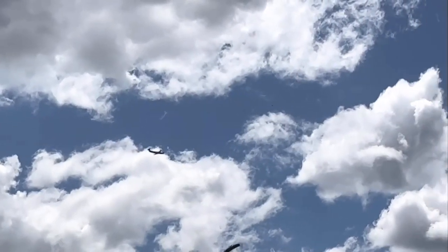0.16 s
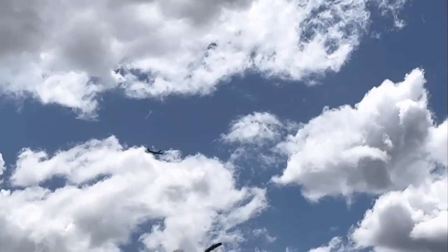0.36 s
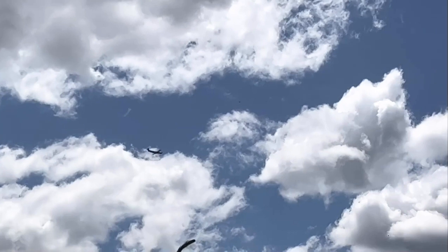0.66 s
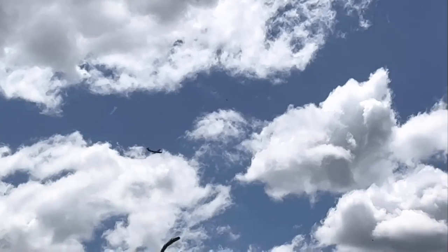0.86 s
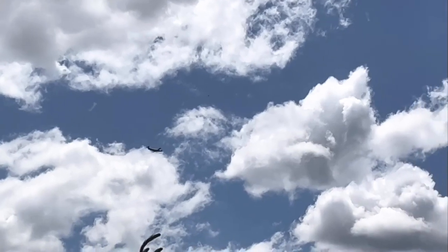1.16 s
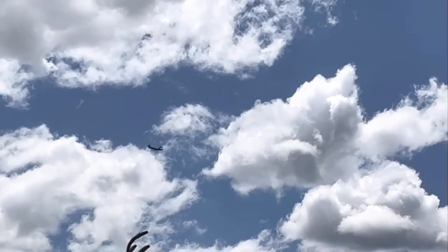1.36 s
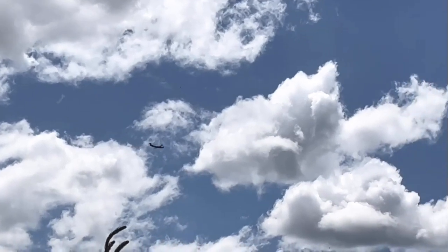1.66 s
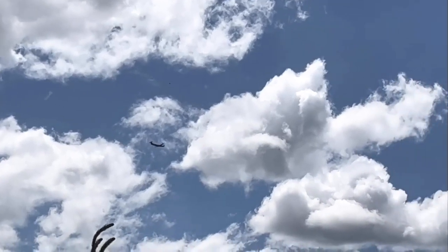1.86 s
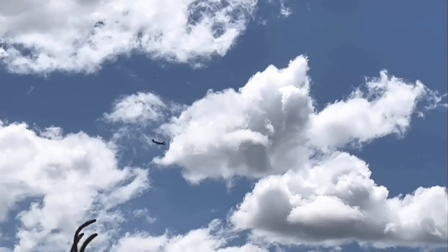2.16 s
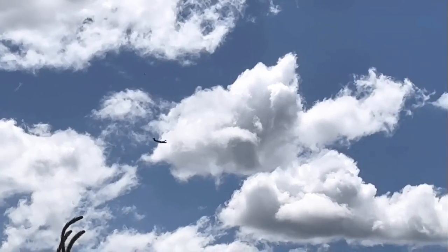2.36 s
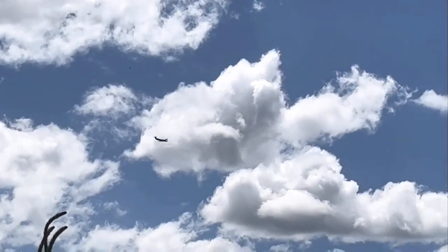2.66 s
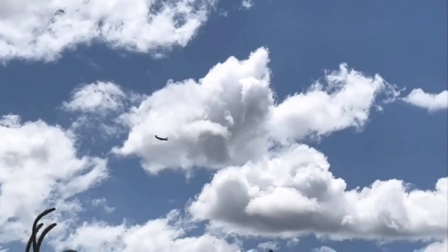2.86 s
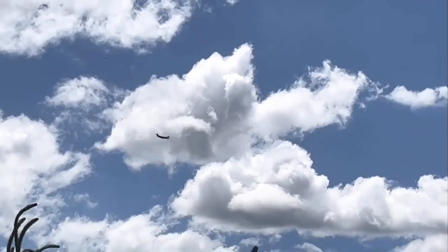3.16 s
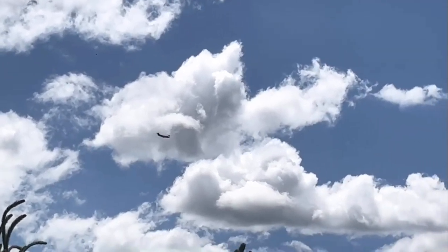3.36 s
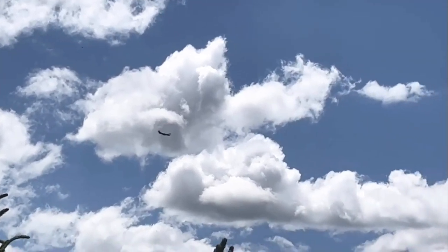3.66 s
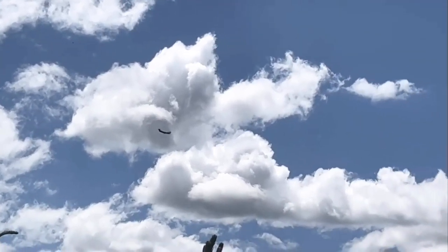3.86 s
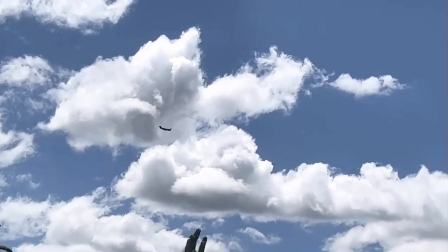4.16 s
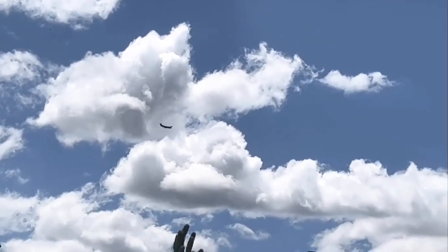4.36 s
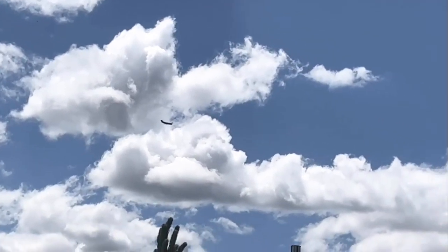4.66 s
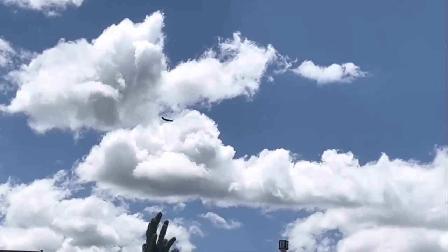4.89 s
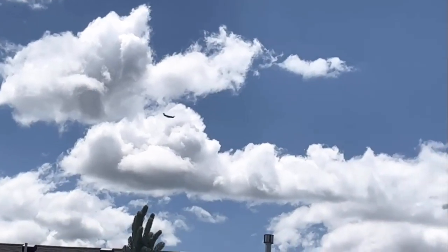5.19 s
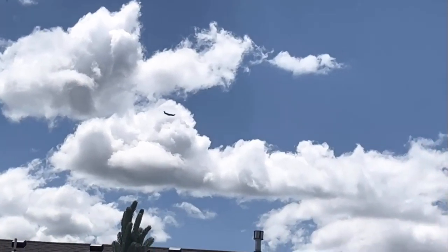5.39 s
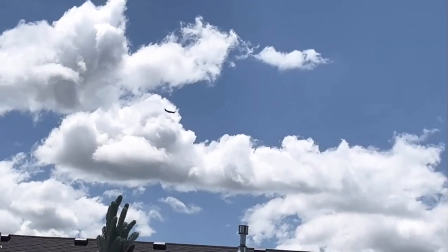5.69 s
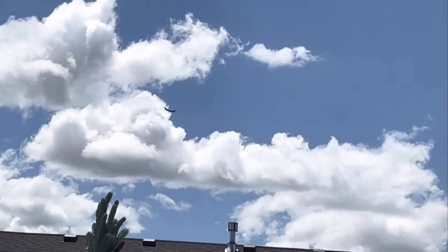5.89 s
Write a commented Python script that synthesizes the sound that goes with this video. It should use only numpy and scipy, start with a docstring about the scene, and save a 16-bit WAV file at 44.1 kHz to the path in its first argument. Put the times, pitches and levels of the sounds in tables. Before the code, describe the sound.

A twin-propeller airplane climbs away, heard from a yard. Its low drone stands out at first and sinks slightly in pitch, while a broad engine roar swells and fades in the moving air. Gusts of wind then buffet the microphone with rumbles and sharp, low thumps. The wind eases, the propeller tone turns faint, and the roar keeps swelling from farther off.

```python
"""From a yard, a twin-propeller airplane is heard climbing away under a breezy sky.
At first its blade tones stand out, sinking slowly in pitch, while moving air makes the broad roar
swell and fade. From just after one second until nearly four, gusts buffet the microphone hardest
and single eddies thump against its port. Then the wind eases, the tones are faint,
and the roar swells on from farther off."""
import sys
import numpy as np
from scipy import signal
from scipy.fft import rfft, irfft
from scipy.io import wavfile
from scipy.ndimage import uniform_filter1d

SR = 44100
rng = np.random.default_rng(int(sys.argv[2]) if len(sys.argv) > 2 else 0)


def wrap_up_sound(samples):
    """Save the sound to the file named by the first command line argument, as 16-bit audio."""
    columns = np.atleast_2d(samples).T
    # keep every value between -1 and 1, then stretch to whole-number steps
    tamed = np.clip(columns, -1, 1)
    steps = np.round(tamed * 32767).astype(np.int16)
    wavfile.write(sys.argv[1], SR, steps)


N = 265906
TIME = np.arange(N) / SR
FREQ = np.maximum(np.arange(N // 2 + 1) * SR / N, 1)


def propellers(body_db, twin_db=-22, detune_hz=1.3, wander_rad=0.13, flutter_db=1.36):
    """Two propellers, slightly out of step; turbulent air shakes the higher harmonics most."""
    # The pitch falls as the airplane turns its tail to the microphone.
    # Each row: time in seconds, blade-passing rate in Hz.
    blade_rate = [(0, 132.1), (1, 130.9), (2, 129.7), (3, 128.6), (4, 127.5), (5, 127), (6, 126)]
    # Blade tones, loudest while the propellers are side-on to the yard.
    # Each row: time in seconds, first harmonic in dB, second harmonic in dB.
    drone = [(0, -37, -52.5), (.35, -34, -37.5), (.5, -38.5, -38.5), (.75, -30, -38.5), (.9, -29, -39),
             (1.65, -25.5, -38), (2.1, -28, -47), (2.33, -34, -39.5), (2.55, -31, -36),
             (2.75, -37.5, -44.5), (3.3, -34.5, -45), (3.52, -49.5, -52), (3.9, -51.5, -54),
             (4.35, -44, -41), (4.65, -45, -51), (4.9, -55, -51), (5.45, -54, -61), (5.8, -44, -47)]
    # Weaker harmonics. Each row: multiple of the blade rate, level in dB against the roar's body.
    overtones = [(3, -7.5), (4, -22.5), (5, -25)]
    blade_phase = 2 * np.pi * np.cumsum(curves(blade_rate)[0]) / SR
    slip = 2 * np.pi * detune_hz * TIME
    tones = list(enumerate(curves(drone), 1)) + [(round(k), body_db + db) for k, db in overtones]
    out = 0
    for k, db in tones:
        phase = k * blade_phase + k ** 2 * wander_rad * walk(7.5) + rng.uniform(0, 2 * np.pi)
        pair = np.sin(phase) + undb(twin_db) * np.sin(phase + k * slip)
        out = out + np.sqrt(2) * pair * undb(db + flutter_db * k * walk(9.5))
    return out


def roar(levels_db, flicker_db=1.5):
    """Broad engine noise; each range fades in its own way on the long path down to the yard."""
    # Each row: frequency in Hz, relative spectral level in dB.
    roar_colour = [(50, -21.5), (110, -1.5), (220, 6), (400, -3), (560, -7), (760, -11), (1000, -9),
                   (1130, -13), (1350, -28), (1650, -18.5), (1900, -28), (2250, -30), (2750, -48.5),
                   (3400, -63)]
    edges_hz = [0, 330, 680, 1350, 3600]  # deep part, body, middle, top
    out = 0
    for lo_hz, hi_hz, db in zip(edges_hz, edges_hz[1:], levels_db):
        band = scatter(noise(roar_colour, lo_hz, hi_hz))
        out = out + even(band, seconds=0.22) * undb(db + flicker_db * walk(12))
    return out


def roar_levels():
    """Four ranges of the roar in dB: all ride the swells, and the upper three fade with distance."""
    # The deep part's slow course. Each row: time in seconds, level in dB.
    rumble = [(0, -44), (.45, -46), (1, -44.5), (1.6, -40), (2.2, -43.5), (2.6, -39.5), (3.5, -49.5),
              (4, -49), (4.35, -45), (4.85, -44.5), (5.4, -45), (6, -39.5)]
    body_lift = swells(share=0.8, bright=-.45)
    deep_db = curves(rumble)[0] + .3 * body_lift
    body_db = -48.3 - 0.55 * TIME + body_lift
    middle_db = -52 - TIME + swells()
    top_db = -61 - 0.42 * TIME + swells(share=0.71, bright=0.98, late=0.93)
    return deep_db, body_db, middle_db, top_db


def swells(share=1, bright=0, late=0, fall_ratio=1.82):
    """Moving air bends the roar towards the microphone; gives the lift of one range in dB."""
    # Each row: crest in seconds, rise in seconds, lift in dB, brightness in dB, lag in seconds.
    # A range weights the last three by share, bright and late.
    crests = [(.08, 0.034, 4, 0, .02), (0.411, 0.074, 11, -3, .045), (.69, 0.12, 2, 2.5, -.03),
              (.96, 0.13, 16, 1.3, 0.062), (1.23, 0.07, 5, -4.5, -0.051), (1.38, 0.098, 3.5, -1.5, 0.051),
              (1.56, .11, 10.5, -1.1, .08), (1.862, 0.09, 6.5, -3, 0.041), (2.12, 0.067, 5.5, 0.8, -0.0088),
              (2.63, 0.11, 9, 1, 0.044), (2.89, .11, 11, -3.5, .06), (3.14, 0.074, 0, 0, 0.5),
              (3.36, 0.13, 1.5, -3, 0.024), (3.69, 0.25, 4, -1.5, .04), (3.98, 0.045, 2.5, 2.5, 0.095),
              (4.18, 0.12, 13.5, -1.5, 0.083), (4.57, 0.053, 2, -2, 0.52), (5.16, 0.13, 1.5, 0, 0.067),
              (5.9, 0.18, 4.5, -1.5, -.04)]
    lift = 0
    for crest_s, rise_s, lift_db, bright_db, lag_s in crests:
        age = (TIME - crest_s - late * lag_s) / rise_s
        shape = np.exp(-(age / np.where(age < 0, 1, fall_ratio)) ** 2)
        lift = lift + (share * lift_db + bright * bright_db) * shape
    return lift


def scatter(x, depth=0.12, spread_s=.009):
    """Stray paths through moving air arrive late and fade in and out, so spectral dips drift."""
    paths = [np.roll(x, int(rng.uniform(.1, 1) * spread_s * SR)) * walk(4.6) for _ in range(6)]
    return x + depth * sum(paths)


def rush(top_db, loud_db=-48, rush_db=-62, growth=2.0, fade_db_s=0.6):
    """The strongest swells carry a bright edge that the air otherwise swallows, more so from afar."""
    # Each row: frequency in Hz, relative spectral level in dB.
    colour = [(1900, -15.0), (2400, -1.0), (2900, -4.5), (3400, -13.5), (3800, -32.0)]
    level_db = rush_db + growth * (top_db - loud_db) - fade_db_s * TIME
    return noise(colour, 1800, 4500) * undb(level_db)


def wind(gain_db=0.35, knee_db=-34, eddy_share=0.29):
    """Turbulence at the microphone port, held back in the hardest gusts, where it breaks into eddies."""
    # Each row: frequency in Hz, relative spectral level in dB.
    wind_colour = [(12, -31.5), (25, -22), (40, -2), (68, 2.5), (110, -2), (180, -14), (300, -14.5),
                   (600, -38), (1500, -66)]
    gust_db = gusts()
    churn_db = gust_db - eddy_share * np.maximum(gust_db - knee_db, 0)
    return even(noise(wind_colour, 0, 2500), seconds=0.075) * undb(churn_db + gain_db)


def gusts(breeze_db=-60, attack_s=0.044, release_s=.05):
    """Wind strength at the microphone in dB: each gust rises, holds and dies back into the breeze."""
    # Each row: start in seconds, length in seconds, strength in dB.
    buffets = [(0.036, 0.13, -47), (0.276, .08, -53), (.61, 0.11, -38), (0.824, 0.27, -42),
               (1.248, .31, -27.5), (1.66, 0.069, -28), (1.88, 0.27, -36.5), (2.248, 0.22, -35.5),
               (2.487, 0.23, -20.5), (2.77, 0.062, -29), (2.864, .1, -29.5), (3.094, 0.17, -36),
               (3.373, 0.044, -28.5), (3.624, 0.15, -29), (3.98, .17, -52.5), (4.5, 0.056, -39.5),
               (4.65, 0.055, -47), (5.543, 0.046, -46.5)]
    power = undb(breeze_db) ** 2
    for start_s, length_s, db in buffets:
        before = np.maximum(start_s - TIME, 0) / attack_s
        after = np.maximum(TIME - start_s - length_s, 0) / release_s
        power = power + (undb(db) * np.exp(-before - after)) ** 2
    return 10 * np.log10(power)


def eddies(rise_cycles=.42, fall_cycles=1.3, slowing=.4):
    """Each eddy hits the port as a pressure swing of a cycle or two that slows as it dies away."""
    # Each row: time of the peak in seconds, envelope peak in dB, pitch in Hz.
    thumps = [(1.395, -13.5, 129.6), (1.546, -24.5, 99.4), (1.67, -13, 95), (2.485, -10.5, 96),
              (2.543, -14, 134), (2.563, -13, 130), (2.597, -15, 192), (2.618, -22, 480), (2.63, -10, 126),
              (2.648, -18.5, 100), (2.792, -14.5, 150), (3.157, -22.5, 260), (3.203, -17, 171),
              (3.321, -20, 250), (3.352, -22, 318), (3.368, -14, 221), (3.616, -20.5, 362),
              (3.654, -27, 277), (3.699, -19.5, 120), (3.732, -16.5, 391), (3.757, -17, 86)]
    out = np.zeros(N)
    for peak_s, db, hz in thumps:
        near = np.abs(TIME - peak_s) < .05
        cycles = (TIME[near] - peak_s) * hz
        shape = np.exp(-(cycles / np.where(cycles < 0, rise_cycles, fall_cycles)) ** 2)
        swing = cycles / np.sqrt(1 + slowing * np.maximum(cycles, 0))
        out[near] += undb(db) * shape * np.sin(2 * np.pi * (swing + rng.uniform()))
    return signal.sosfilt(signal.butter(4, 1600, fs=SR, output="sos"), out)


def hiss(level_db=-87):
    """A faint, steady hiss behind everything."""
    # Each row: frequency in Hz, relative spectral level in dB.
    hiss_colour = [(100, -1), (3000, 1), (5200, 0.5), (6500, -8), (9000, -4), (11000, -7), (13000, -29)]
    return undb(level_db) * noise(hiss_colour)


def undb(db):
    """Decibels to gain."""
    return 10 ** (np.asarray(db) / 20)


def curves(table):
    """Each value column of (seconds, value, ..) rows, joined by straight lines."""
    times_s, *columns = np.transpose(table)
    return [np.interp(TIME, times_s, column) for column in columns]


def noise(colour, lo_hz=0, hi_hz=SR):
    """Noise of rms 1 with a colour of (Hz, dB) points, kept between two edges."""
    hz, db = np.transpose(colour)
    gain = undb(np.interp(np.log(FREQ), np.log(hz), db)) * (FREQ > lo_hz) * (FREQ < hi_hz)
    x = irfft(rfft(rng.standard_normal(N)) * gain, N)
    return x / x.std()


def walk(rate_hz):
    """Smooth random drift of spread 1 that changes about rate_hz times a second."""
    x = irfft(rfft(rng.standard_normal(N)) / (1 + (FREQ / rate_hz) ** 4), N)
    return x / x.std()


def even(x, seconds):
    """Noise without its slow swells, so that a control sets its strength."""
    return x / np.sqrt(uniform_filter1d(x ** 2, max(int(seconds * SR), 2)) + 1e-12)


def scene():
    """One microphone in the yard: the airplane far off, the wind right at the port, a faint hiss."""
    deep_db, body_db, middle_db, top_db = roar_levels()
    airplane = propellers(body_db) + roar([deep_db, body_db, middle_db, top_db]) + rush(top_db)
    return (airplane + wind() + eddies() + hiss())[None]


def record(dry, image_db=-63, image_hz=9600, bass_hz=24, top_hz=12300):
    """The recorder drops the deepest bass, mirrors a faint whine into the treble and cuts the top."""
    x = signal.sosfilt(signal.butter(2, bass_hz, "high", fs=SR, output="sos"), dry)
    x = x * (1 + undb(image_db) * np.cos(2 * np.pi * image_hz * TIME))
    return signal.sosfilt(signal.ellip(8, .2, 70, top_hz, fs=SR, output="sos"), x)


dry = scene()
out = record(dry)
wrap_up_sound(out)
```